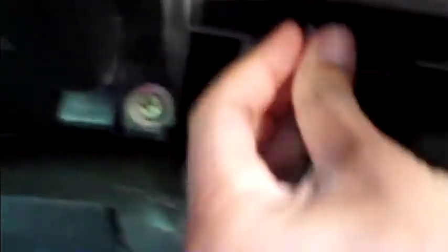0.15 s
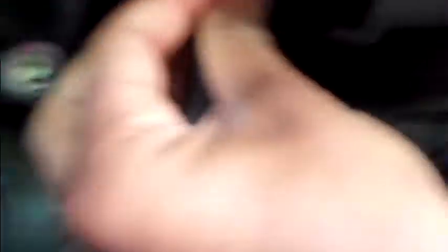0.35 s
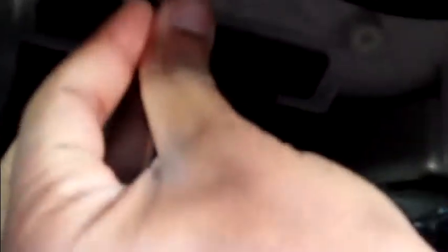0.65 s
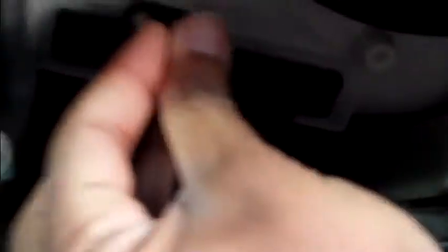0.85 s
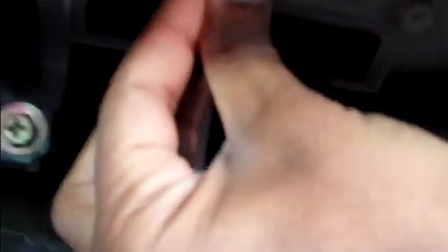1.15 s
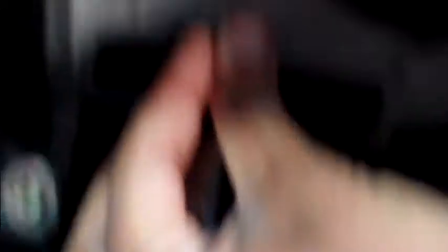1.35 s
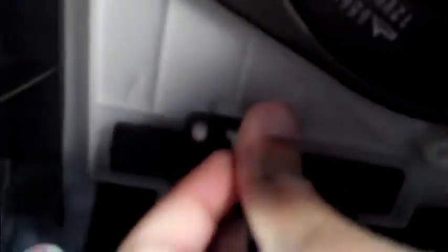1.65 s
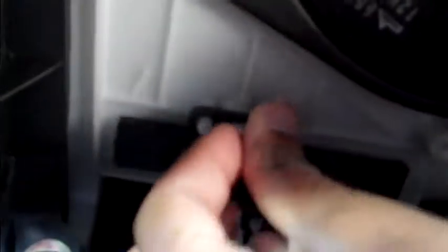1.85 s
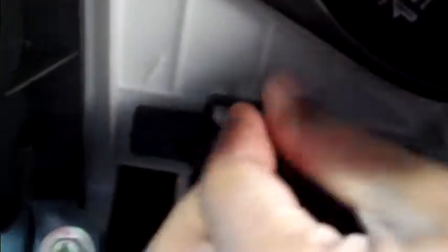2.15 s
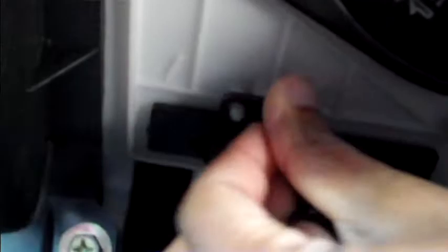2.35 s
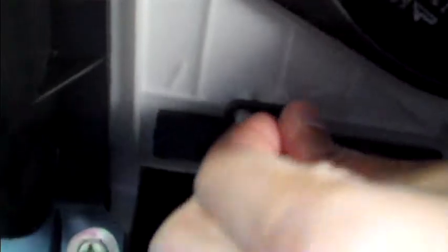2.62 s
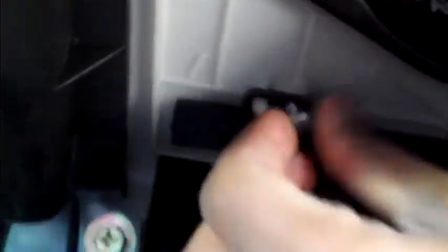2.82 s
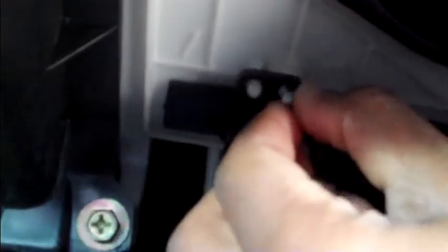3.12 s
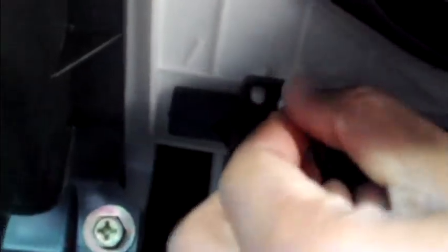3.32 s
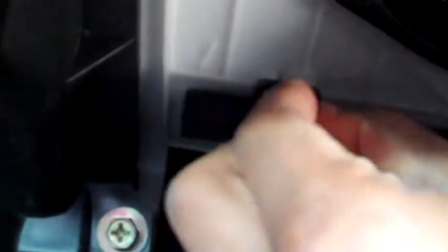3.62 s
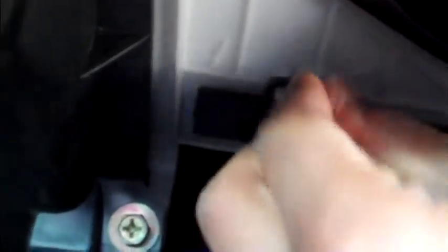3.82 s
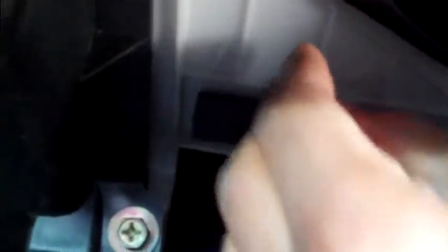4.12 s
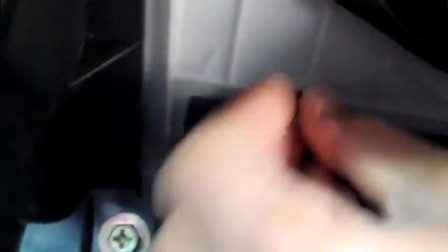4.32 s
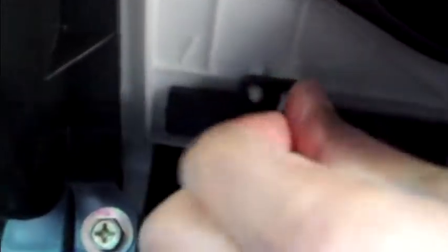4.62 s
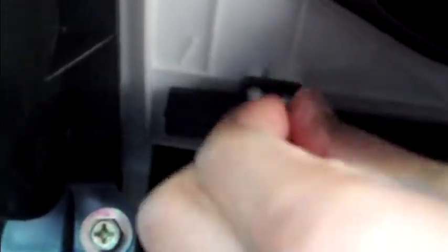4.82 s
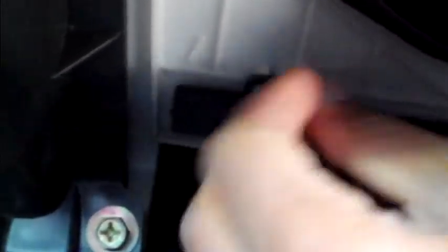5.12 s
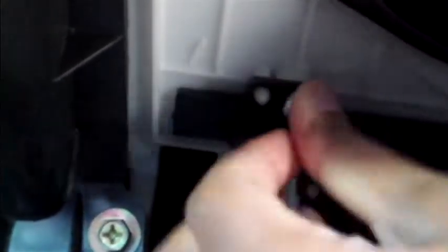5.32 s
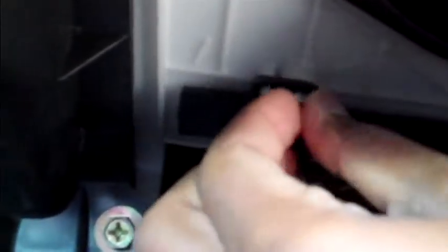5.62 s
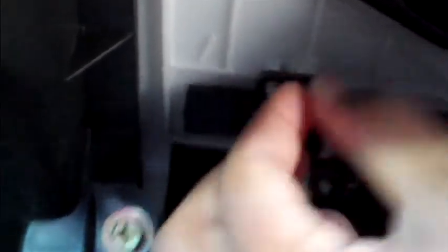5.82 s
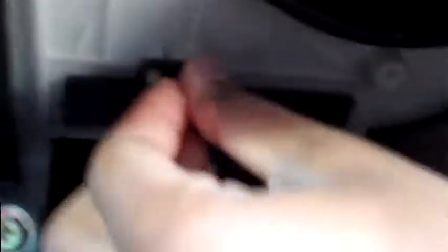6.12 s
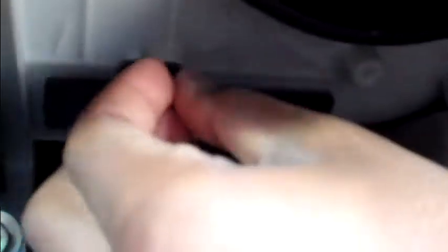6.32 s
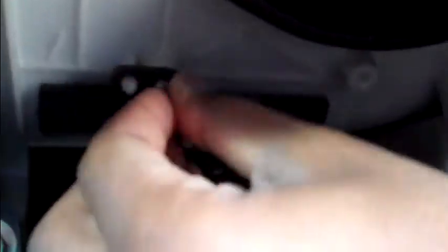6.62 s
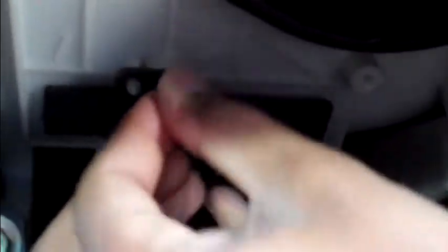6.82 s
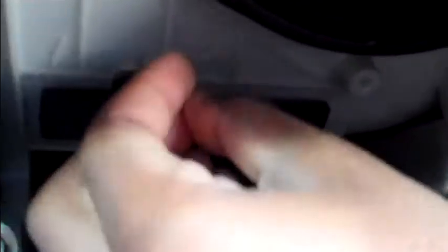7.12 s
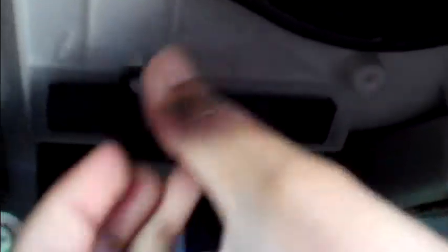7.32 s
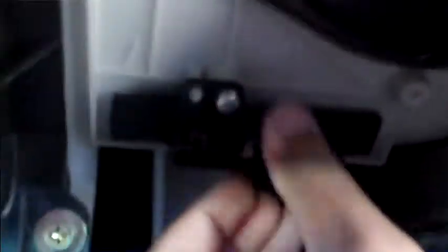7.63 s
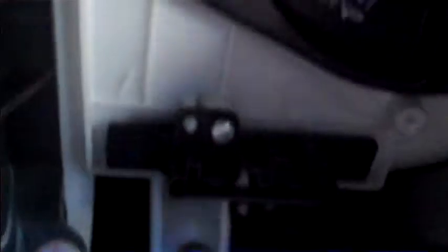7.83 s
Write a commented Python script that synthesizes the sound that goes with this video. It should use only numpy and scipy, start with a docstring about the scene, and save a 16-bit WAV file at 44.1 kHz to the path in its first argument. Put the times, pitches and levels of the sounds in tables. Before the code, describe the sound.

Hands work at a plastic bracket under a dashboard, captured close with almost no room echo. Hiss is strongest at first over a low rumble, and a faint wavering hum passes through early on. Knocks, clicks and one sharp metallic snap come first, then clusters of bumps and scuffs, grating thread catches, thin squeaks and a last knock before quieter rubbing.

```python
"""A soft hiss and a low rumble come first, in a dead-sounding car cabin, with a faint hum for a while.
Then fingers rub and knock as they turn a small screw into a plastic bracket under the dashboard, close by.
Blows ring the struck part's own tones and a short rattle; rubbing is smooth noise mixed with tiny random slips.
Twists grate through the screw's resonances, and gliding tones with their octave make the squeaks.
Two microphone ports hear it all: the right one is weaker and out of step in the treble."""
import sys
import numpy as np
from scipy import signal
from scipy.fft import rfft, irfft, next_fast_len
from scipy.io import wavfile
from scipy.ndimage import uniform_filter1d, map_coordinates

SR = 44100
rng = np.random.default_rng(int(sys.argv[2]) if len(sys.argv) > 2 else 0)


def materialize(psi):
    """Save the field psi as 16-bit PCM at rate SR to the path in sys.argv[1].

    A 1-D psi becomes a single channel; in a 2-D psi each row is a channel.
    """
    bounded = np.clip(np.atleast_2d(psi).T, -1, 1)
    quanta = np.round(bounded * 32767).astype(np.int16)
    wavfile.write(sys.argv[1], SR, quanta)


N = 351036
TIME = np.arange(N) / SR


def undb(db):
    """Turn decibels into an amplitude factor."""
    return 10 ** (np.asarray(db) / 20)


def unit(x):
    """Scale to rms 1."""
    return x / np.sqrt(np.mean(x ** 2))


def blend(a, b, share):
    """Mix two sounds, giving the second this share of the power."""
    share = np.clip(share, 0, 1)
    return np.sqrt(1 - share) * unit(a) + np.sqrt(share) * unit(b)


def add(out, s, sound):
    """Mix a sound in from time s."""
    room = out[int(s * SR):][:len(sound)]
    room += sound[:len(room)]


def over_hz(points, size):
    """Read (Hz, value) points at the bins of a transform, on a log pitch scale."""
    hz, value = np.transpose(points)
    bins_hz = np.fft.rfftfreq(size, 1 / SR)
    return np.interp(np.log(bins_hz + 1), np.log(hz), value)


def colour(x, points):
    """Filter to a (Hz, dB) shape without smearing sound ahead of its start; rms 1 out."""
    size = next_fast_len(len(x), True) * 2
    cepstrum = irfft(np.log(undb(over_hz(points, size))))
    # folding the cepstrum makes the filter minimum-phase
    cepstrum[1:size // 2] *= 2
    cepstrum[size // 2 + 1:] = 0
    response = np.exp(rfft(cepstrum))
    return unit(irfft(rfft(x, size) * response)[:len(x)])


def band(x, lo_hz, hi_hz):
    """Keep only the sound between two pitches, with a causal filter."""
    sos = signal.butter(3, [lo_hz, hi_hz], "band", fs=SR, output="sos")
    return signal.sosfilt(sos, x)


def walk(rate):
    """Random levels, rate per second, joined by slopes; rms near 1."""
    hold = int(SR / rate)
    steps = np.repeat(rng.standard_normal(N // hold + 1), hold)
    return unit(uniform_filter1d(steps, hold)[:N])


def fade(t, t60):
    """Exponential decay that falls 60 dB in t60 seconds."""
    return np.exp(-np.log(1000) * t / t60)


def hollow(x, echo_db, t60):
    """The cupped hand sends back a cloud of very near echoes, drawn afresh for each pose."""
    t = np.arange(SR // 50) / SR
    echoes = rng.standard_normal(len(t)) * fade(t, t60)
    response = 1. * (t == 0) + undb(echo_db) * echoes / np.linalg.norm(echoes)
    return signal.fftconvolve(x, response)[:len(x)]


# Background levels: (time_s, rumble_db, hiss_db); the hiss is louder at first
CABIN_LEVELS = [(0.0, -50.5, -47.5), (0.8, -49.5, -52), (1.4, -48.5, -52.5), (1.9, -52, -55),
                (7.95, -51, -54)]
# Tone colour of the rumble: (pitch_hz, level_db)
RUMBLE_COLOUR = [(15, -42), (30, -2.5), (45, -4.5), (65, 4.5), (90, 1), (125, 2), (160, -12), (200, -11.5),
                 (300, -23), (600, -55.5)]
# Tone colour of the hiss: (pitch_hz, level_db)
HISS_COLOUR = [(100, 5), (300, -1.5), (1100, -1), (1500, -5.5), (3000, -8), (5500, -9.5), (7500, -13.5),
               (10000, -18.5), (14000, -32)]
RUMBLE_WAVER_DB, HISS_WAVER_DB = 2.1, 1


def cabin():
    """Coloured noise makes a wavering rumble, and hiss that is partly different at the two ports."""
    s, rumble_db, hiss_db = np.transpose(CABIN_LEVELS)
    rumble_gain = undb(np.interp(TIME, s, rumble_db) + RUMBLE_WAVER_DB * walk(3.6))
    rumble = rumble_gain * colour(rng.standard_normal(N), RUMBLE_COLOUR)
    hiss_gain = undb(np.interp(TIME, s, hiss_db) + HISS_WAVER_DB * walk(8.8))
    shared, left, right = (hiss_gain * colour(rng.standard_normal(N), HISS_COLOUR) for _ in range(3))
    return rumble + undb(-1.5) * shared, undb(-4.0) * np.array([left, right])


# Path of the faint hum: (time_s, pitch_hz, level_db)
HUM_PATH = [(1.1, 135, -64), (1.4, 135, -45), (1.801, 124, -62), (2.3, 124, -53.5), (2.8, 132, -50),
            (3.3, 143, -53), (3.7, 140, -66)]
HUM_WAVER, HUM_FLUTTER_DB = 0.0418, 1.5  # waver as a share of the pitch; flutter in dB


def hum():
    """A faint low sine tone whose pitch wavers and whose level comes and goes."""
    s, hz, db = np.transpose(HUM_PATH)
    wavering_hz = np.interp(TIME, s, hz) * (1 + HUM_WAVER * walk(25))
    phase = 2 * np.pi * np.cumsum(wavering_hz) / SR
    return undb(np.interp(TIME, s, db) + HUM_FLUTTER_DB * walk(11)) * np.sin(phase)


def slips(rate, scatter_db):
    """Tiny stick-slip releases at random moments (rate per second), a few much larger than the rest."""
    sizes = undb(scatter_db * np.minimum(rng.exponential(size=N), 5))
    happens = rng.random(N) < rate / SR
    return unit(happens * sizes * rng.choice([-1, 1], N))


# Countless small modes stirred by blows and ticks, also heard in blow_sound: (pitch_hz, level_db)
RATTLE_COLOUR = [(60, -34), (150, 14.5), (280, -0.5), (600, 6), (1000, -2.5), (1600, -9), (3000, -13),
                 (5500, -5), (8000, -14), (11000, -21.5), (15000, -35)]
FIDGET_PER_S, FIDGET_DB = 26, -66


def fidget():
    """Faint stray ticks of nail and screw, scattered at random as the fingers shift their hold."""
    ticks = colour(slips(rate=FIDGET_PER_S, scatter_db=2.0), RATTLE_COLOUR)
    return undb(FIDGET_DB) * unit(hollow(ticks, echo_db=-2.5, t60=0.016))


def blow_sound(modes, ring_hz, rattle_db, rattle_t60, tick_db, tail_db, tail_t60,
               spot_db, detune, echo_db, local_db, local_t60):
    """A struck part rings in its own fading tones, with a tick, a noisy rattle and a tone of the spot."""
    t = np.arange(SR // 4) / SR
    hz, mode_db, mode_t60 = np.transpose(modes)[:, :, None]
    spot, stretch = rng.standard_normal((2, len(modes), 1))  # no two blows land on the same spot
    tones = np.sin(2 * np.pi * hz * (1 + detune * stretch) * t) * fade(t, mode_t60)
    ring = (undb(mode_db + spot_db * spot) * tones).sum(axis=0)
    local = unit(np.sin(2 * np.pi * ring_hz * t) * fade(t, local_t60))
    rattle_fade = fade(t, rattle_t60) + undb(tail_db) * fade(t, tail_t60)
    rattle = colour(rng.standard_normal(len(t)) * rattle_fade, RATTLE_COLOUR)
    tick = colour(1. * (t == 0), RATTLE_COLOUR)
    mix = unit(ring) + undb(local_db) * local + undb(rattle_db) * rattle + undb(tick_db) * tick
    return hollow(mix, echo_db, t60=0.015)


# a light touch lands on soft flesh, so the weaker the blow, the larger its share of thud
THUD_DB_PER_DB, LIGHT_TOUCH_DB = -0.1321, -58.5
# parts slide for a moment before they strike
LEAD_IN_S, LEAD_IN_DB = 0.0054, -10.5


def blows(table, modes, thud_db, crack_t60, **sound_settings):
    """Each blow slides in, then sounds in bands: thud, tock with clack, and a crack that dies first."""
    out, t = np.zeros(N), np.arange(SR // 4) / SR
    rise = np.linspace(0, 1, int(LEAD_IN_S * SR))
    for s, db, crack_db, clack_db, ring_hz in table:
        sound = blow_sound(modes, ring_hz, **sound_settings)
        thud, tock = band(sound, 110, 400), band(sound, 400, 1400)
        clack, crack = band(sound, 1400, 3300), band(sound, 3300, 15000)
        body = unit(tock) + undb(clack_db) * unit(clack)
        flesh_db = thud_db + THUD_DB_PER_DB * (db - LIGHT_TOUCH_DB)
        crack = crack * fade(t, crack_t60)  # plastic damps treble first
        for part, gain_db in (thud, flesh_db), (body, 0), (crack, crack_db):
            rms = np.sqrt(np.sum(part ** 2) / (.02 * SR))  # whole energy spread over 20 ms
            add(out, s, undb(db + gain_db) * part / rms)
        slide = colour(rng.standard_normal(len(t)), RATTLE_COLOUR)[-len(rise):]
        add(out, s - LEAD_IN_S, undb(db + LEAD_IN_DB) * rise * slide)
    return out


# In all four blow tables crack_db is relative to level_db, and clack_db is upper middle against lower
# Hand and parts bumping the trim: (start_s, level_db, crack_db, clack_db, pitch_hz)
BUMP_TIMES = [(0.437, -35.5, -12, -16, 590), (1.06, -44, -13, -8, 830), (1.084, -42.5, -12, 3.5, 437),
              (1.3315, -34.5, -30, -14, 660), (1.5022, -25, -16, -14, 540), (1.5275, -36.5, -16, -13, 689),
              (1.6163, -35, -14, -5, 500), (1.6672, -44, -18, -16, 600), (1.9112, -41, -15, 3.5, 1280),
              (2.229, -38.5, -27, -15, 620), (2.244, -49, -27, 0, 1350), (2.4175, -40, -4.5, -3.5, 414),
              (2.5796, -40.5, -7.5, -8.5, 710), (2.839, -45, -8.5, -10, 560), (2.8562, -33.5, -9, -8, 713),
              (2.954, -36.5, -1, -5, 514), (3.167, -44, -15, -4, 746), (3.7754, -40.5, -13, -10.5, 490),
              (3.7974, -40.5, -18, -11, 540), (3.865, -47.5, -14, -2, 354), (3.8795, -44, -14, 1, 302),
              (3.9874, -38, -15, -8, 506), (4.205, -45, -28, -12, 683), (4.4547, -36, -10, -8, 700),
              (4.4857, -26, -12, 0, 730), (4.7492, -44, -16, -12, 710), (4.872, -41.5, -24, -7.5, 710),
              (4.9735, -42.5, -12, -12, 560), (4.986, -41, -20, -14, 475), (5.0116, -32, -5.5, -3.5, 468),
              (5.0245, -31.5, -7, 3, 480), (5.031, -33.5, -5, -6, 450), (5.1653, -29, -23, -6.5, 600),
              (5.36, -43, -9, -10, 850), (5.385, -38, -3.5, -6.5, 710), (5.7265, -48, -10.5, -1.5, 1103),
              (5.86, -37, -7, -8, 1035), (5.869, -38, -9, -12, 734), (6.105, -44, -13, -10, 467),
              (7.0835, -28.5, -9.5, -2.5, 1000), (7.09, -23.5, -19, -8, 890), (7.336, -34, -18, -6, 996),
              (7.5513, -45.5, -12, -11, 416), (7.674, -43, -20, -20, 836)]
# Ringing tones of the hollow trim panel: (pitch_hz, level_db, t60_s)
TRIM_TONES = [(223, -3, 0.075), (403, -16.5, 0.11), (500, 2.5, 0.019), (700, 4.5, 0.026), (852, -3, 0.07),
              (1286, -4, 0.047), (1676, -8.5, 0.038), (2143, -7.5, 0.05), (2740, -3, 0.025),
              (3880, -14.5, 0.055), (5600, -41.5, 0.021)]


def bumps():
    """Dull bumps ring the hollow trim panel, with a strong rattle and tick."""
    return blows(BUMP_TIMES, TRIM_TONES, thud_db=-3.0, crack_t60=0.12,
                 rattle_db=0.5, rattle_t60=0.047, tick_db=-9.5, tail_db=-29.5, tail_t60=0.15,
                 spot_db=5.5, detune=0.019, echo_db=-21.0, local_db=-3, local_t60=0.036)


# The hand knocking the dashboard itself: (start_s, level_db, crack_db, clack_db, pitch_hz)
KNOCK_TIMES = [(0.3315, -32.5, -16, -5, 915), (0.338, -15, -18.5, -9, 583), (0.3505, -32.5, -31, -2, 510)]
# Ringing tones of the dashboard shell: (pitch_hz, level_db, t60_s)
DASH_TONES = [(188, 5.5, 0.053), (440, -8, 0.042), (506, 6.5, 0.065), (567, 1, 0.044), (710, 3, 0.028),
              (895, 1.5, 0.03), (1000, -2, 0.035), (1370, -5, 0.03), (1736, -6, 0.046), (2030, -21, 0.03),
              (2740, -9, 0.046), (3770, -2, 0.028), (4800, -6, 0.032), (7700, -1, 0.023)]


def knocks():
    """Knocks of the hand ring the dashboard shell, strongest in its low tones."""
    return blows(KNOCK_TIMES, DASH_TONES, thud_db=-4.5, crack_t60=0.049,
                 rattle_db=-5, rattle_t60=0.029, tick_db=-18, tail_db=-28, tail_t60=0.14,
                 spot_db=4.0, detune=0.0049, echo_db=-8, local_db=-13.0, local_t60=0.029)


# Screw and hard plastic clicking together: (start_s, level_db, crack_db, clack_db, pitch_hz)
CLICK_TIMES = [(0.6924, -39, -22, 6.5, 1690), (0.8341, -29, -13.5, 11.5, 1734),
               (0.8445, -42.5, -16, 2, 1650), (1.0117, -37, -22, 9.5, 2730), (1.2995, -43, -10, 2, 2750),
               (1.3245, -27, -16.5, 6.5, 1640), (1.3262, -33.5, -1, 24, 3820), (2.6106, -54, 5, 2, 2770),
               (4.6, -28.5, -10, 6, 1240), (4.609, -42, -19, 2, 900)]
# Ringing tones of the bracket: (pitch_hz, level_db, t60_s)
BRACKET_TONES = [(600, -11, 0.031), (890, 5.5, 0.0385), (1363, 2, 0.037), (1656, 3.5, 0.03),
                 (2020, 3, 0.018), (2220, -1.5, 0.024), (2714, 9, 0.018), (3000, -9, 0.044),
                 (3740, 3.5, 0.018), (4000, -6, 0.03), (5120, -7, 0.019), (6600, -2, 0.021),
                 (7200, -16.5, 0.025), (8440, -6, 0.022)]


def clicks():
    """The screw strikes hard plastic, and the bracket rings briefly with little thud."""
    return blows(CLICK_TIMES, BRACKET_TONES, thud_db=-20, crack_t60=0.051,
                 rattle_db=-2.5, rattle_t60=0.041, tick_db=-18, tail_db=-26, tail_t60=0.069,
                 spot_db=3.5, detune=0.01, echo_db=-5.5, local_db=-13.5, local_t60=0.036)


# The screw snapping hard against the metal: (start_s, level_db, crack_db, clack_db, pitch_hz)
SNAP_TIMES = [(1.5048, -13.5, -1.5, 20, 2740)]
# Ringing tones of the screw and metal fitting: (pitch_hz, level_db, t60_s)
METAL_TONES = [(1730, -2.5, 0.045), (2090, -1.5, 0.022), (2580, -2.5, 0.039), (2760, 6.5, 0.035),
               (3120, 0, 0.02), (3500, 0, 0.024), (3710, -2, 0.02), (4480, -10.5, 0.015), (4920, -4, 0.016),
               (6360, -3, 0.016), (7200, 5.5, 0.025), (7510, -15.5, 0.027), (8370, -9, 0.017),
               (9230, -8.5, 0.018)]


def snaps():
    """A sharp snap rings the screw and metal fitting, nearly in tune with the table."""
    return blows(SNAP_TIMES, METAL_TONES, thud_db=-21, crack_t60=0.068,
                 rattle_db=-3, rattle_t60=0.04, tick_db=-32, tail_db=-14, tail_t60=0.065,
                 spot_db=-1.0, detune=0.00096, echo_db=-32.5, local_db=-15.5, local_t60=0.035)


GLIDE_WAVER_DB = 2  # unevenness of smoothly gliding skin


def skin_textures():
    """Gliding skin is uneven noise; dragging skin slips in sparse or dense jerks as the grip lets go."""
    grip = unit(undb(2.6 * walk(150) + 1.63 * walk(55)))
    gliding = rng.standard_normal(N) * undb(GLIDE_WAVER_DB * walk(70))
    coarse = grip * slips(rate=420, scatter_db=2.5)
    fine = grip * slips(rate=2700, scatter_db=1.5)
    return gliding, coarse, fine


SWELL_SHARE = 0.49  # part of a push's length spent building pressure
PUSH_CURVE = 1  # 1 is a straight rise and fall; above 1 the crest is sharper


def swell_and_dying(length):
    """Split a push's length into seconds before and after its crest."""
    return SWELL_SHARE * length, (1 - SWELL_SHARE) * length


def pressure(crest, swell, dying):
    """The stretch of time that a push takes, and its rising and falling force."""
    span = slice(int((crest - swell) * SR), int((crest + dying) * SR))
    force = np.interp(TIME[span], [crest - swell, crest, crest + dying], [0, 1, 0])
    return span, force ** PUSH_CURVE


RING_GLIDE = 0.05  # typical share by which a resonance drifts either side of its centre in a push


def sweep(x, hz, width):
    """A resonance (width as a share of its centre) that drifts up or down as the finger rolls."""
    speed = np.exp(RING_GLIDE * rng.standard_normal() * np.linspace(-1, 1, len(x)))
    ringing = band(x, hz * (1 - width / 2), hz * (1 + width / 2))
    # reading the sound faster or slower bends its pitch
    return unit(map_coordinates(ringing, [np.cumsum(speed)], mode="mirror"))


# The trim under a rubbing finger: (pitch_hz, level_db)
TRIM_RUB_COLOUR = [(70, -28), (190, 8.5), (290, 0), (480, 2.5), (730, 4), (1000, -1), (1170, -5),
                   (1320, 0.5), (1550, -5), (2300, -10), (2750, 0), (3100, -14), (4500, -32)]
# Dry skin and nail: (pitch_hz, level_db)
RASP_COLOUR = [(1200, -29), (2600, 8), (3700, 4), (4500, -3), (5800, 8), (7100, 1), (9000, 0),
               (10500, -8.5), (12000, -1), (14500, -34)]
# The screw grating in its hole: (pitch_hz, level_db)
SCREW_COLOUR = [(2000, -31), (3250, -9), (3850, 8.5), (4200, -0.5), (4650, -3.5), (5200, 1), (5600, 6),
                (6200, -3), (8000, -19.5), (10000, -37), (13000, -37.5)]
HOLD_DETUNE = 0.018  # typical share by which resonances shift from hold to hold
SCREW_RING_WIDTH, SKIN_RING_WIDTH = 0.11, 0.27  # resonance the grip picks out, share of its centre
TWIST_SCREW_SHARE = 0.84  # share of the rasp's power that rings the screw, in twists and catches


def rub(out, textures, crest, swell, dying, trim_db, rasp_db, share, ring_hz, ring_db, width, grain):
    """One push of the fingers shakes the trim, rasps and rings the screw; each hold shifts the tones."""
    span, push = pressure(crest, swell, dying)
    gliding, coarse, fine = (texture[span] for texture in textures)
    hold = [np.exp(HOLD_DETUNE * rng.standard_normal()), 1]  # moves the pitches, not the levels
    heavy = blend(gliding, coarse + 0.65 * fine, grain)
    light = blend(gliding, fine + .5 * coarse, grain)
    skin = colour(light, np.array(RASP_COLOUR) * hold)
    screw = colour(heavy, np.array(SCREW_COLOUR) * hold)
    scrape = unit(blend(skin, screw, share)) + undb(ring_db) * sweep(light, ring_hz, width)
    trim = colour(heavy, np.array(TRIM_RUB_COLOUR) * hold)
    for sound, db in (trim, trim_db), (scrape, rasp_db):
        out[span] += undb(db) * push * unit(hollow(sound, echo_db=-3.5, t60=0.026))


# Skin dragging on the trim: (crest_s, length_s, level_db, pitch_hz)
SCUFF_TIMES = [(0.277, 0.02, -41, 830), (0.305, 0.056, -39, 447), (0.392, 0.04, -42, 576),
               (0.435, 0.07, -37, 597), (0.443, 0.027, -41.5, 890), (2.238, 0.05, -43, 238),
               (3.177, 0.022, -38.5, 810), (3.896, 0.081, -42, 206), (4.994, 0.02, -41, 520),
               (5.031, 0.069, -37, 423), (5.124, 0.05, -43, 640), (6.014, 0.03, -48, 820),
               (6.14, 0.031, -39, 700), (6.23, 0.065, -52.5, 600), (6.313, 0.022, -45, 790),
               (7.398, 0.056, -43.5, 292), (7.413, 0.02, -56, 700)]
SCUFF_WIDTH = 0.28  # width of a scuff's resonance as a share of its centre


def scuffs(textures):
    """Skin drags on the trim and makes it groan: sparse slips heard through one narrow resonance."""
    out, coarse = np.zeros(N), textures[1]
    for s, length, db, ring_hz in SCUFF_TIMES:
        span, push = pressure(s, *swell_and_dying(length))
        groan = band(coarse, ring_hz * (1 - SCUFF_WIDTH / 2), ring_hz * (1 + SCUFF_WIDTH / 2))
        out[span] += undb(db) * push * unit(groan[span])
    return out


# Fingers sliding over plastic, and in the last row a sleeve brushing past; grain runs from 0 smooth gliding to
# 1 jerky slips: # (crest_s, length_s, trim_db, rasp_db, pitch_hz, grain)
STROKE_TIMES = [(0.32, 0.12, -38, -44.5, 5840, 0.7), (0.373, 0.078, -50, -50, 2740, 0.9),
                (0.426, 0.11, -39.5, -40, 5200, 0.8), (0.576, 0.046, -47.5, -50, 5800, 0.4),
                (1.626, 0.07, -37, -45, 6730, 1), (1.793, 0.037, -40.5, -43, 3500, 0.7),
                (2.21, 0.081, -45, -47.5, 5670, 0.64), (2.345, 0.065, -45.5, -40.5, 6050, 0.4),
                (2.416, 0.099, -45, -43.5, 5800, 0.5), (2.53, 0.12, -59.5, -53.5, 5750, 0.6),
                (2.911, 0.17, -41.5, -41.5, 6360, 0.26), (3.087, 0.033, -43.5, -35, 7140, 0.23),
                (3.193, 0.085, -40.5, -40, 5800, 0.7), (3.205, 0.016, -48, -29.5, 6400, 0.7),
                (3.283, 0.095, -49, -50, 5900, 0.75), (3.466, 0.11, -46, -47.5, 7000, 0.5),
                (3.525, 0.092, -44, -45, 6840, 0.46), (3.59, 0.15, -46.5, -47, 3360, 0.3),
                (3.789, 0.071, -59, -47.5, 4500, 0.3), (3.928, 0.13, -43, -48, 2640, 0.83),
                (4.003, 0.052, -37, -40, 6600, 0.56), (4.036, 0.074, -42, -44, 2880, 0.62),
                (4.203, 0.073, -47, -47, 2800, 0.8), (4.34, 0.059, -46.5, -55.5, 5800, 0.2),
                (4.39, 0.053, -44, -37, 2630, 0.26), (4.47, 0.029, -28, -33, 8900, 0.3),
                (4.614, 0.028, -33, -36, 2700, 0.2), (4.95, 0.23, -44.5, -48, 4100, 0.02),
                (5.032, 0.055, -32.5, -43, 2600, 0.8), (5.126, 0.17, -42.5, -46, 6340, 0.2),
                (5.441, 0.061, -41, -48.5, 6800, 0.6), (6.135, 0.106, -53, -55, 2680, 0.7),
                (6.468, 0.028, -47, -51, 2780, 0.7), (7.031, 0.065, -43.5, -46, 6400, 0.4),
                (7.079, 0.065, -34.5, -35.5, 5000, 0.77), (7.145, 0.025, -56, -50, 4560, 0.2),
                (7.411, 0.042, -44, -51, 4800, 0.3), (7.548, 0.084, -48, -52, 5800, 0.4),
                (7.858, 1, -60, -53, 6940, 0.04)]
STROKE_SCREW_SHARE, SKIN_RING_DB = 0.22, -4  # screw's share of the rasp; strength of the grip's resonance


def strokes(textures):
    """Fingers slide over plastic, and at the end a sleeve brushes past, with mostly skin and only a little
    screw in the rasp."""
    out = np.zeros(N)
    for s, length, trim_db, rasp_db, ring_hz, grain in STROKE_TIMES:
        rub(out, textures, s, *swell_and_dying(length), trim_db, rasp_db,
            STROKE_SCREW_SHARE, ring_hz, SKIN_RING_DB, SKIN_RING_WIDTH, grain)
    return out


# Thread and fingertips squeaking; roughness runs from 0 to 1:
# (start_s, end_s, first_pitch_hz, last_pitch_hz, level_db, roughness)
SQUEAK_TIMES = [(5.87, 5.943, 1322, 1300, -49.5, 0.05), (5.919, 5.987, 1286, 1275, -46, 0.025),
                (5.974, 6.057, 1290, 1290, -48.5, 0.02), (6.075, 6.125, 1280, 1320, -57, 0.08),
                (6.12, 6.185, 486, 440, -38.5, 0.06), (6.45, 6.493, 1390, 1870, -46, 0.19),
                (6.557, 6.595, 1348, 1280, -41.5, 0), (6.836, 6.897, 411, 370, -48, 0.34),
                (7.487, 7.561, 1880, 1524, -51.5, 0.19)]
SQUEAK_OCTAVE_DB, SQUEAK_FLUTTER_DB = -9.5, 2.5
SQUEAK_WANDER = 0.008  # share by which a squeak's pitch wanders


def squeaks():
    """The slips fall almost into step for a moment: an unsteady gliding tone and its octave."""
    out, wobble, flutter = np.zeros(N), walk(500), undb(SQUEAK_FLUTTER_DB * walk(110))
    wander = SQUEAK_WANDER * walk(35)
    for start, end, from_hz, to_hz, db, rough in SQUEAK_TIMES:
        span = slice(int(start * SR), int(end * SR))
        progress = np.linspace(0, 1, span.stop - span.start)
        glide_hz = from_hz + (to_hz - from_hz) * progress
        unsteady_hz = glide_hz * (1 + wander[span] + rough * wobble[span])
        phase = 2 * np.pi * np.cumsum(unsteady_hz) / SR
        tone = np.sin(phase) + undb(SQUEAK_OCTAVE_DB) * np.sin(2 * phase)
        out[span] += undb(db) * np.sin(np.pi * progress) * flutter[span] * tone
    return out


# The thread catching and slipping free: (crest_s, rasp_db, trim_db, pitch_hz)
CATCH_TIMES = [(2.858, -25, -33, 5660), (2.907, -44, -44, 6800), (5.333, -36, -51, 4000),
               (5.995, -53, -46, 2800), (6.045, -49, -39, 3970), (6.1341, -42.5, -47, 5600),
               (6.2334, -53, -52, 4040), (6.266, -39.5, -47, 4100), (6.3092, -36, -39, 3880),
               (6.341, -34.5, -42, 3640), (6.3659, -41.5, -49, 4400), (6.6595, -56, -43.5, 2960),
               (7.404, -42, -49, 4400)]
CATCH_ATTACK_S, CATCH_RELEASE_S, CATCH_RING_DB = 0.0022, 0.014, 5
CATCH_GRAIN = 0.42  # share of jerky slips


def catches(textures):
    """The thread catches and slips free: a very short push with a strong ring."""
    out = np.zeros(N)
    for s, rasp_db, trim_db, ring_hz in CATCH_TIMES:
        rub(out, textures, s, CATCH_ATTACK_S, CATCH_RELEASE_S, trim_db, rasp_db,
            TWIST_SCREW_SHARE, ring_hz, CATCH_RING_DB, SCREW_RING_WIDTH, CATCH_GRAIN)
    return out


# The screw being twisted; the grip sets where it rings:
# (crest_s, length_s, trim_db, rasp_db, pitch_hz, ring_db)
TWIST_TIMES = [(0.27, 0.065, -42, -37.5, 5600, -2), (2.87, 0.016, -31.5, -34.5, 5600, 1),
               (2.954, 0.047, -49, -35.5, 3700, -5), (5.277, 0.025, -31, -31.5, 5450, -1),
               (5.317, 0.064, -32.5, -30.5, 5370, -10), (5.672, 0.1, -51, -46, 5600, -2),
               (5.857, 0.073, -45.5, -39.5, 5440, -2), (6.036, 0.11, -51, -48, 4080, -14),
               (6.31, 0.26, -48, -48, 3040, -14), (6.586, 0.076, -39.5, -34, 4080, -0.5),
               (6.702, 0.072, -47, -49.5, 4160, 4), (7.28, 0.24, -51, -50.5, 4870, -9),
               (7.378, 0.086, -51.5, -30.5, 4930, -1.5), (7.671, 0.048, -52.5, -39.5, 5540, 3.5)]
TWIST_GRAIN = 0.74  # share of jerky slips


def twists(textures):
    """The screw is twisted and grates in its hole, in jerky slips that ring mostly the screw."""
    out = np.zeros(N)
    for s, length, trim_db, rasp_db, ring_hz, ring_db in TWIST_TIMES:
        rub(out, textures, s, *swell_and_dying(length), trim_db, rasp_db,
            TWIST_SCREW_SHARE, ring_hz, ring_db, SCREW_RING_WIDTH, TWIST_GRAIN)
    return out


# Level of the right port against the left: (pitch_hz, level_db)
RIGHT_PORT_LEVEL = [(60, -5.5), (300, -7), (1200, -6), (2500, -8), (4400, -5.5), (8000, -0.5),
                    (14000, -3.5)]
# Lag of the right port behind the left: (pitch_hz, lag_radians)
RIGHT_PORT_LAG = [(100, 0.49), (2700, -0.64), (4500, -1.5), (5400, -1.55), (6200, -1.46), (7200, -1.27),
                  (8200, 1.53), (9500, 1.35), (10500, 1.88), (14000, 1.5)]


def ports(x):
    """The left port faces the work; the right is shaded, so weaker, and out of step in the treble."""
    size = 2 * next_fast_len(N, True)
    right = undb(over_hz(RIGHT_PORT_LEVEL, size)) * np.exp(-1j * over_hz(RIGHT_PORT_LAG, size))
    both = np.array([np.ones_like(right), right])
    balance = 2 / (1 + np.abs(right))  # keeps the average strength of the two ports
    return irfft(rfft(x, size) * both * balance)[:, :N]


def scene():
    """All the handling happens in one spot; each port catches its own faint near echoes of it."""
    background, port_hiss = cabin()
    textures = skin_textures()
    struck = bumps() + knocks() + clicks() + snaps()
    rubbed = scuffs(textures) + strokes(textures) + catches(textures) + twists(textures)
    handling = ports(fidget() + struck + rubbed + squeaks())
    heard = np.array([hollow(port, echo_db=-21, t60=0.008) for port in handling])
    return heard + ports(background + hum()) + port_hiss


TOP_HZ = 14400


def record(dry):
    """Peaks beyond 0.88 are cut flat, then a steep filter removes the treble above TOP_HZ."""
    low_pass = signal.ellip(10, .1, 70, TOP_HZ, fs=SR, output="sos")
    return signal.sosfiltfilt(low_pass, np.clip(dry, -.88, .88))


dry = scene()
out = record(dry)
materialize(out)
```